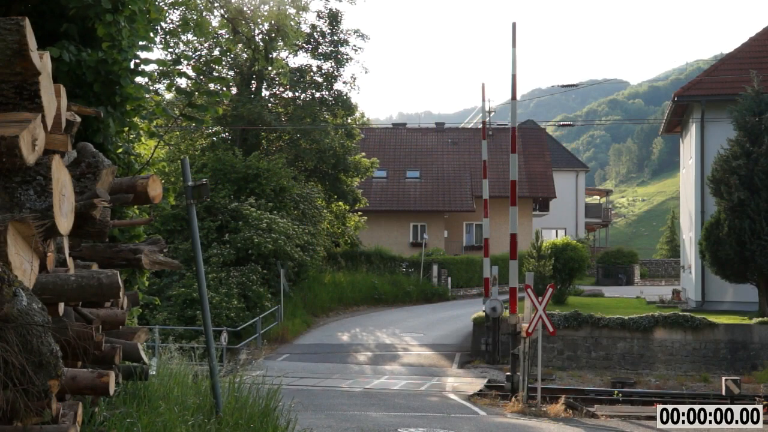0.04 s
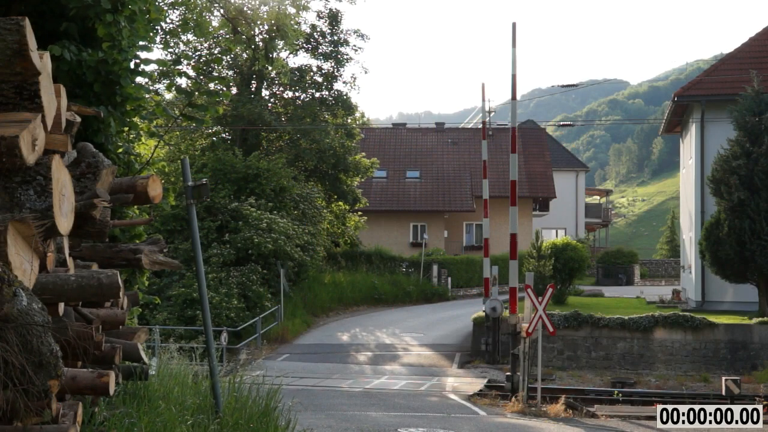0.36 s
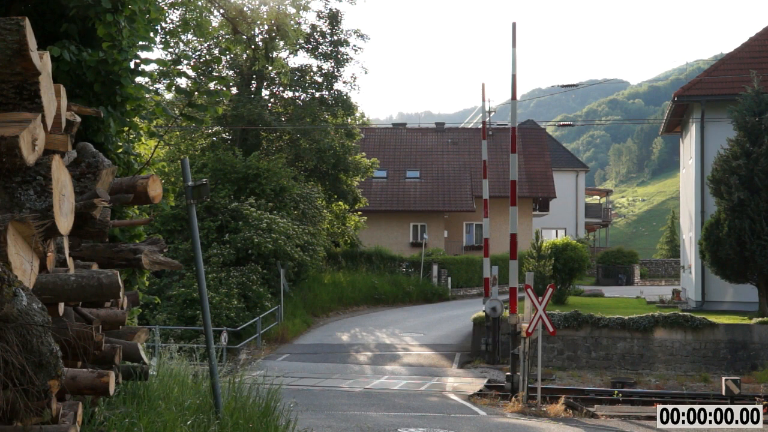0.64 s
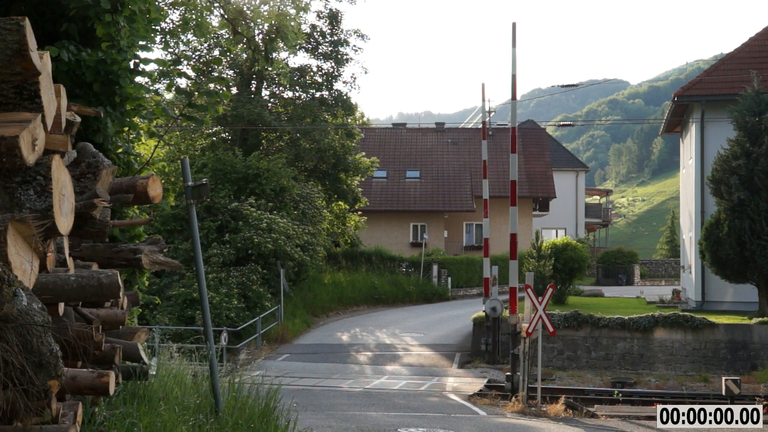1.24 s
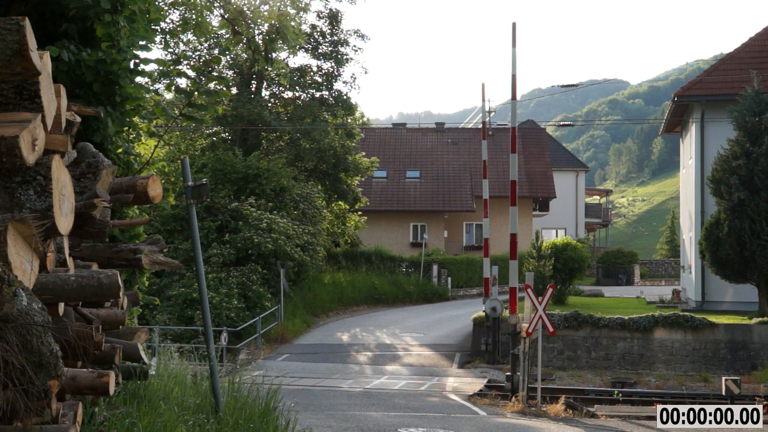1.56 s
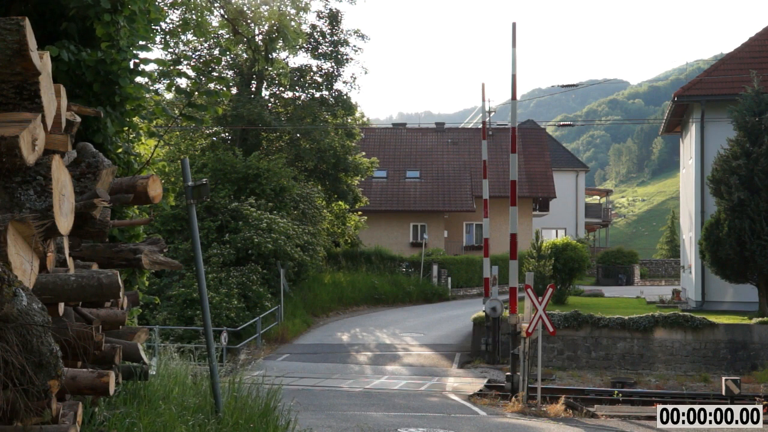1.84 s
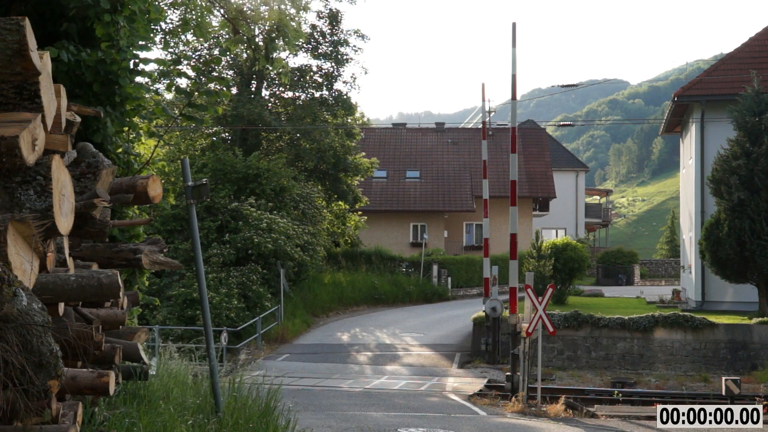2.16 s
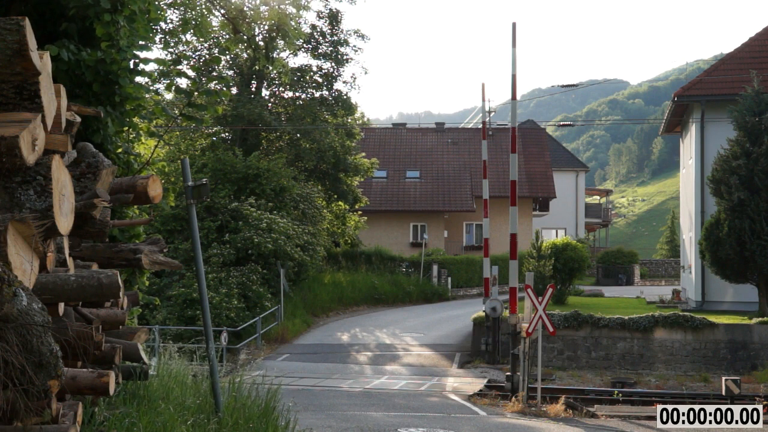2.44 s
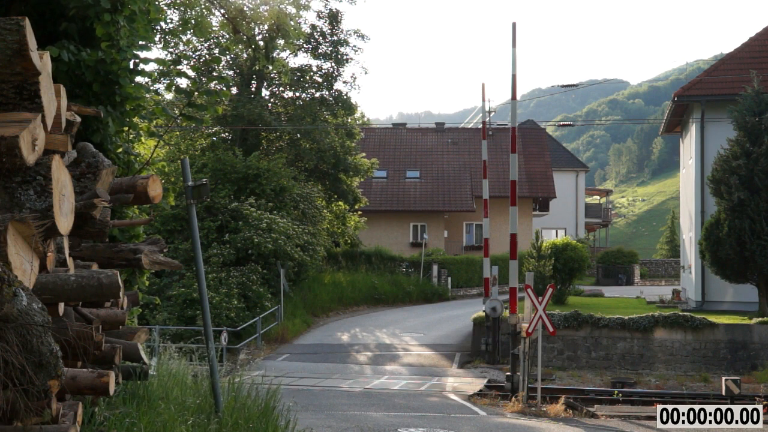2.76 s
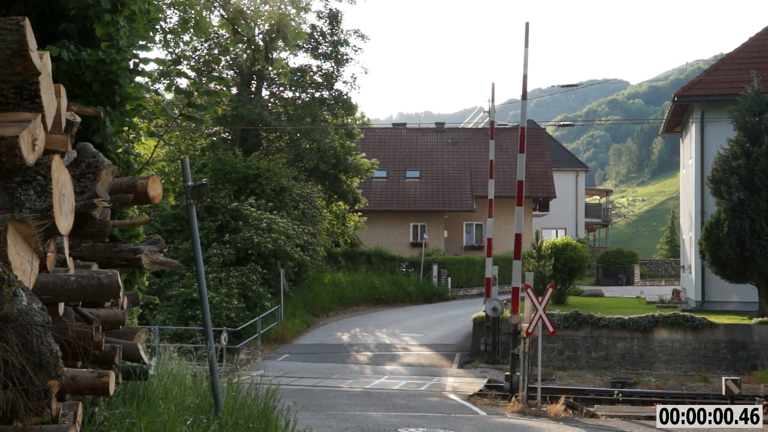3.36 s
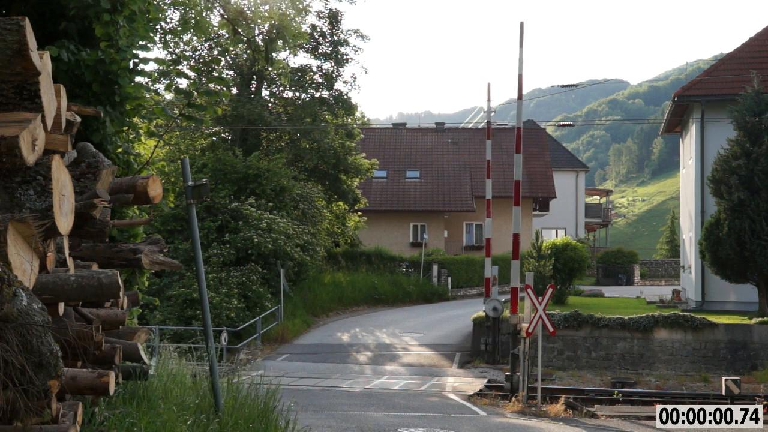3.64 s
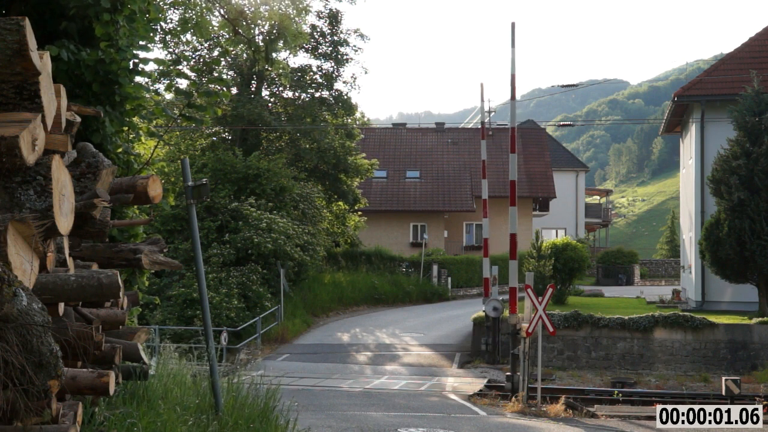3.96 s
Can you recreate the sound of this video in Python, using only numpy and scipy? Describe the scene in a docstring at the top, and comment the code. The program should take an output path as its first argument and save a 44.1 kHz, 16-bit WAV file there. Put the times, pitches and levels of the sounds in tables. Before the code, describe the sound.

A level crossing barrier starts up with uneven metallic clicks, rattles and clunks, slightly to the right. Before it, a songbird sings briefly close on the left and distant birds chirp faintly over a steady outdoor rush.

```python
"""A village level crossing on a calm day. A songbird sings gliding, trilled syllables close by on the
left; others chirp and whistle far off in the trees. Then the barrier's drive starts: a steel pawl
clicks unevenly, small parts ring and rattle, and the gear housing clunks as the booms begin to move.
Houses and trees echo the birds faintly, over the steady rush of the valley."""
import sys
import numpy as np
from scipy import signal
from scipy.fft import rfft, irfft, next_fast_len
from scipy.io import wavfile
from scipy.ndimage import uniform_filter1d, map_coordinates

SR = 44100
rng = np.random.default_rng(int(sys.argv[2]) if len(sys.argv) > 2 else 0)


def put_to_file(sound):
    """Save the sound as 16-bit audio at rate SR, in the file named by the first command-line argument."""
    columns = np.atleast_2d(sound).T  # one column per channel
    safe = np.clip(columns, -1, 1)
    whole_steps = np.round(safe * 32767)
    wavfile.write(sys.argv[1], SR, whole_steps.astype(np.int16))


N = 176400
T = np.arange(N) / SR


# Syllables: t/s, length/s, start, middle and end f/Hz, start and end level/dB, trill rate/Hz, trill depth
SYLLABLES = [(0.0, 0.023, 4140, 3120, 2260, -26.5, -36, 107, 0.068),
             (0.023, 0.025, 2650, 2670, 1870, -34, -41, 61, 0.0086),
             (0.115, 0.026, 6420, 4060, 5100, -35.5, -40.5, 164, 0.21),
             (0.13, 0.08, 2325, 2150, 3040, -47, -35, 182, 0.11),
             (0.191, .1, 2700, 3500, 3750, -31.5, -37, 200, 0.095),
             (0.332, 0.036, 2530, 6270, 5300, -42.5, -38, 135, 0.051),
             (0.365, 0.016, 6000, 4800, 4200, -30, -35.5, 148, 0.12),
             (0.415, 0.013, 1900, 3460, 5400, -56.5, -29, 190, .02),
             (0.43, 0.023, 5190, 5450, 5100, -34, -35.5, 180, 0.13),
             (0.449, 0.033, 5070, 3050, 2110, -24.5, -38, 143, 0.17),
             (0.561, 0.067, 6990, 5700, 5500, -37.5, -42, 68, 0.066),
             (.613, .178, 4700, 3380, 2580, -31, -34, 53.7, .115),
             (0.794, 0.085, 2430, 1950, 1560, -39.5, -58, 52, 0.1)]
# The singer's place on the left: f/Hz, left over right/dB
SONG_PAN = [(2900, 8.5), (4200, 4)]

def songbird(rough=0.02165, treble_hz=4300, direct_hz=5600, swell_db=2.5, waver_db=2.5):
    """Gliding syllables, rougher the higher they go; near leaves, then trees, scatter the treble."""
    voice, rasp = np.zeros(N), wobble(1000)
    for start, length, f0, f1, f2, db0, db1, rate, depth in SYLLABLES:
        u, gate = note(start, length, edge_s=.002)
        glide = arc(u, f0, f1, f2)
        cycle = 2 * np.pi * rate * (T - start)
        trill = 0.8 * depth * np.cos(cycle - 0.73)
        hz = glide * (1 + trill + rough * (glide / treble_hz) ** 2 * rasp)
        dip_db = 40 * depth * (1 - np.cos(cycle - 2 * np.pi * 0.29))  # loudest as the trill slides down
        db = arc(u, db0, (db0 + db1) / 2 + swell_db, db1) - dip_db
        voice += gate * amp(db) * sine(hz)
    voice *= amp(waver_db * wobble(150))
    treble = filtered(voice, lambda hz: hz ** 2 / (hz ** 2 + treble_hz ** 2))
    direct = filtered(voice, lambda hz: 1 / np.hypot(1, (hz / direct_hz) ** 2))
    leaves = echo(treble, t60=.07, build_s=.001)[0]
    trees = echo(treble, t60=0.72, build_s=.005)[0]
    near = filtered(direct + amp(-3) * (leaves + trees), lambda hz: sides(along(SONG_PAN, hz)))
    return near + amp(-10) * echo(voice, t60=0.9, build_s=0.0053)


# Pawl hits: t/s, clatter level/dB, pawl ring level/dB, struck link f/Hz
PAWL_HITS = [(2.573, -41, -48.5, 4720), (2.78, -41, -47, 3470), (2.905, -51.5, -55.5, 3560),
             (3.013, -45.5, -49.5, 2180), (3.116, -51, -57.5, 3700), (3.161, -48.5, -60, 5100),
             (3.249, -52.5, -62, 5030), (3.331, -49.5, -58, 1490), (3.422, -49.5, -62, 3250),
             (3.499, -44, -50.5, 2240), (3.529, -43.5, -72, 1720), (3.633, -50.5, -53, 3920),
             (3.708, -48, -61, 3660), (3.782, -47.5, -49.5, 2540), (3.906, -49.5, -56.5, 4290),
             (3.96, -50, -67, 1360), (3.994, -45.5, -57, 2590)]
# Tone of the clatter: f/Hz, relative level/dB
CLATTER_EQ = [(300, -19.5), (620, -3), (1500, -4.5), (2300, 1), (5100, -1), (6600, -5), (8200, -11),
              (10500, -16), (13000, -17), (16000, -51)]
# Resonances of the linkage: f/Hz, width/Hz, boost/dB
LINKAGE_MODES = [(587, 91, 11.2), (3440, 230, 3.6)]
# The pawl's bright ring: f/Hz, half-width/Hz, relative level/dB
PAWL_MODES = [(10540, 92, -3), (11320, 96, 8), (12800, 83, -13), (14100, 110, -10)]

def pawl(crack_db=2.5, ticks_from_s=3.6, ticks_rise_s=.3, ticks_per_s=64):
    """Each click cracks, sets the linkage clattering and rings the pawl; late on, loose links tick."""
    times, db, ring_db, _ = np.transpose(PAWL_HITS)
    spacing, strength = rng.random((200, 2)).T
    tick_times = ticks_from_s + np.cumsum(-np.log(spacing)) / ticks_per_s
    fade_in = np.clip((tick_times - ticks_from_s) / ticks_rise_s, .01, 1)
    tick_db = -54 + 10 * strength + 20 * np.log10(fade_in)
    ticks = struck(tick_times, tick_db, t60=0.023, attack=0.00022)
    cracks = struck(times, db + crack_db, t60=0.035, attack=0.0002)
    tails = struck(times, db, t60=0.69, attack=0.0019)
    clatter = np.sqrt(cracks ** 2 + ticks ** 2 + tails ** 2) * amp(0.33 * wobble(500))
    modes = lambda hz: sum(amp(level) / (1 + ((hz - f) / w) ** 2) for f, w, level in PAWL_MODES)
    ring = struck(times, ring_db, t60=0.43, attack=0.00045) * wash(modes, DRIVE_LIKENESS)
    return clatter * steel(CLATTER_EQ, LINKAGE_MODES) + ring


def snaps(hz=4800, boost_db=17, t60=0.0032, delay_s=0.000504, expansion=1.37):
    """The pawl lands on its tooth with a snap of a few cycles; hard hits snap out of all proportion."""
    hardest_db = max(hit[1] for hit in PAWL_HITS)
    out = np.zeros(N)
    for start, db, _, _ in PAWL_HITS:
        age = np.maximum(T - start - delay_s, 0)
        peak_db = hardest_db + boost_db + expansion * (db - hardest_db)
        out += amp(peak_db - 60 * age / t60) * np.sin(2 * np.pi * hz * age)
    return out * sides(along(DRIVE_PAN_CURVE, hz))


def links():
    """Each click rings one link most, at that link's own pitch."""
    return sum(ringing(start, db - 6, hz, width=0.038, t60=0.39) for start, db, _, hz in PAWL_HITS)


# Gear clunks: t/s, level/dB, knock f/Hz
GEAR_HITS = [(3.33, -50.5, 1590), (3.5, -55, 1470), (3.527, -36, 1275), (3.583, -50.5, 930),
             (3.71, -47.5, 1180), (3.743, -47, 1110), (3.811, -40, 1354), (3.861, -42, 700),
             (3.904, -48.5, 650), (3.962, -44.5, 1360)]
# Tone of the housing: f/Hz, relative level/dB
HOUSING_EQ = [(100, -38), (300, 3.5), (500, -26), (850, 6.5), (1400, 2.5), (1900, -2), (3300, -8),
              (6000, -23), (15000, -28)]
# Resonances of its panels: f/Hz, width/Hz, boost/dB
PANEL_MODES = [(880, 110, 5.9), (1090, 17, 11), (1254, 13, 21.5), (1400, 28, 11), (1650, 72, 7)]
# Its low body: f/Hz, relative level/dB
BODY_EQ = [(45, -24), (120, -9.5), (300, -2), (450, 0), (650, 2), (3000, -34)]

def housing(judder_db=1.0, body_db_per_octave=-8.5):
    """Slack gears knock on the housing and ring its panels; deeper knocks shake its whole body more."""
    times, db, pitch = np.transpose(GEAR_HITS)
    knocks = sum(ringing(start, level - 1, hz, width=0.059, t60=0.21) for start, level, hz in GEAR_HITS)
    panels = struck(times, db - 3, t60=0.55, attack=0.00088) * steel(HOUSING_EQ, PANEL_MODES)
    body_db = db - 13 + body_db_per_octave * np.log2(pitch / 960)
    body = struck(times, body_db, t60=0.66, attack=0.009) * steel(BODY_EQ, [])
    return (knocks + panels + body) * amp(judder_db * wobble(180))


# Stereo image of the drive: f/Hz, left-right correlation
DRIVE_LIKENESS = [(3100, 0.83), (11000, 0.75)]
# The drive's place, mostly right of centre: f/Hz, left over right/dB
DRIVE_PAN_CURVE = [(250, -0.5), (700, -2.5), (3100, -5), (7000, 1)]

def steel(eq, resonances):
    """The dense modes of a steel part in the drive; a few stand out."""
    boost = lambda hz: sum(db / (1 + (2 * (hz - f) / width) ** 2) for f, width, db in resonances)
    modes = wash(lambda hz: amp(along(eq, hz) + boost(hz)), DRIVE_LIKENESS)
    return filtered(patchy(modes), lambda hz: sides(along(DRIVE_PAN_CURVE, hz)))


def ringing(start, db, pitch, width, t60):
    """One struck part: a cluster of close modes that dies away."""
    tone = wash(lambda hz: 1 / (1 + ((hz / pitch - 1) / width) ** 2), DRIVE_LIKENESS)
    age = np.maximum(T - start, 0)
    envelope = amp(db - 60 * age / t60) * (1 - np.exp(-age * pitch / 2))
    return envelope * tone * sides(along(DRIVE_PAN_CURVE, pitch))


# Distant chirps: t/s, length/s, start f/Hz, end f/Hz, level/dB
FAR_CHIRPS = [(1.309, .03, 4700, 3400, -61.5), (1.442, .04, 3490, 2100, -69),
              (1.692, 0.061, 3330, 3020, -65.5), (1.948, .045, 2450, 2300, -64.5),
              (2.084, 0.071, 2890, 2800, -63.5), (2.142, 0.045, 2500, 2420, -63),
              (2.179, 0.033, 5170, 3500, -49), (2.303, .07, 3960, 4600, -60), (2.4, 0.026, 3540, 2920, -59),
              (2.434, 0.069, 3980, 4500, -59.5), (2.443, 0.015, 2610, 2660, -61),
              (2.477, 0.098, 2670, 2830, -59.5)]

def far_birds(jitter=0.036, rough_hz=3500):
    """Faint slurred notes from the trees; the high ones buzz."""
    voices, rasp = np.zeros(N), jitter * wobble(500)
    for start, length, f0, f1, db in FAR_CHIRPS:
        u, gate = note(start, length, edge_s=0.0029)
        hz = f0 * (f1 / f0) ** u * (1 + rasp * (f1 / rough_hz) ** 4)
        voices += gate * amp(db) * sine(hz)
    return voices + amp(-4) * echo(voices, t60=0.44, build_s=0.0042)


# Contour of the high whistle: t/s, f/Hz, level/dB
WHISTLE_CONTOUR = [(0, 7800, -63), (.4, 7840, -61), (.5, 8070, -59), (1.219, 7670, -61), (1.38, 7460, -81)]

def whistler(jitter=0.0202, flutter_db=3.5):
    """A small bird's thin, quivering whistle."""
    times, hz, db = np.transpose(WHISTLE_CONTOUR)
    tone = sine(np.interp(T, times, hz) * (1 + jitter * wobble(600)))
    voice = (T < times[-1]) * amp(np.interp(T, times, db) + flutter_db * wobble(40.4)) * tone
    return voice + amp(-3.5) * echo(voice, t60=0.32, build_s=0.0068)


# Tone of the air bed: f/Hz, relative level/dB
AIR_EQ = [(22, -38), (48, -17.5), (200, -6), (1050, -0.5), (2200, -12), (4500, -13), (10500, -22),
          (12000, -19), (15500, -22)]
# Its stereo image: f/Hz, left-right correlation
AIR_LIKENESS = [(60, 1), (240, 0.62), (950, 0.22), (12000, 0.96)]

def valley(level_db=-55):
    """The steady far rush of the valley."""
    return amp(level_db + 0.25 * wobble(5.4)) * wash(lambda hz: amp(along(AIR_EQ, hz)), AIR_LIKENESS)


def echo(x, t60, build_s):
    """Stereo scatter from trees and walls."""
    t = T[:SR]
    tail = rng.standard_normal((2, SR)) * amp(-60 * t / t60) * (1 - np.exp(-t / build_s))
    return signal.fftconvolve(x[None], tail / np.linalg.norm(tail[0]), axes=1)[:, :N]


def struck(times, db, t60, attack):
    """Envelope of a part whose energy is topped up by each blow and dies away."""
    samples = np.clip(np.round(times * SR).astype(int), 0, N)
    blows = np.bincount(samples, amp(db) ** 2, N + 1)[:N]
    decay, soften = amp(-120 / (t60 * SR)), np.exp(-1 / (attack * SR))
    energy = signal.lfilter([1], [1, -decay], blows)
    return np.sqrt(np.abs(signal.lfilter([1 - soften], [1, -soften], energy)))


def patchy(x, depth_db=4.0, bins=2, frames=24):
    """Partials drift in level, so different ones stand out from blow to blow."""
    spectra = signal.stft(x, nperseg=1024)[2]
    drift = uniform_filter1d(rng.standard_normal(spectra.shape[1:]), bins, 0)
    drift = unit(uniform_filter1d(drift, frames, 1))
    return unit(signal.istft(spectra * amp(depth_db * drift), nperseg=1024)[1][:, :N])


def wash(colour, likeness):
    """Stereo noise of rms 1 with a colour and a left-right likeness."""
    angle = lambda hz: np.arccos(np.clip(along(likeness, hz), -1, 1)) / 2
    noise = rng.standard_normal((2, N))
    mid, side = filtered(noise, lambda hz: colour(hz) * [np.cos(angle(hz)), np.sin(angle(hz))])
    return unit(np.array([mid + side, mid - side]))


def note(start, length, edge_s):
    """Progress through a note, 0 to 1, and its soft gate."""
    u = np.clip((T - start) / length, 0, 1)
    edge = np.clip(np.minimum(u, 1 - u) * length / edge_s, 0, 1)
    return u, np.sin(np.pi / 2 * edge) ** 2


def arc(u, start, middle, end):
    """A parabola through three values."""
    return start * (1 - u) * (1 - 2 * u) + middle * 4 * u * (1 - u) + end * u * (2 * u - 1)


def sine(hz):
    """A pure tone following a pitch curve."""
    return np.sin(2 * np.pi * np.cumsum(hz) / SR)


def wobble(rate):
    """A smooth random curve, rate knots a second."""
    return map_coordinates(rng.standard_normal(8192), [T * rate], mode="wrap")


def filtered(x, response):
    """x shaped by a gain for each frequency."""
    size = next_fast_len(N + SR // 2)
    return irfft(rfft(x, size) * response(np.fft.rfftfreq(size, 1 / SR)), size)[..., :N]


def along(points, hz):
    """Read a curve of (f/Hz, value) points on a log axis."""
    f, values = np.transpose(points)
    return np.interp(np.log(hz + 1), np.log(f + 1), values)


def sides(pan_db):
    """Left and right gains; positive pans left."""
    return amp(np.array([[.5], [-.5]]) * pan_db)


def amp(db):
    """Decibels to gain."""
    return 10 ** (np.asarray(db) / 20)


def unit(x):
    """Scale to rms 1."""
    return x / np.sqrt(np.mean(x ** 2) + 1e-20)


def scene():
    """Birds, barrier drive and valley air."""
    return songbird() + far_birds() + whistler() + pawl() + snaps() + links() + housing() + valley()


def record(dry):
    """A brick-wall high cut on the mix."""
    return filtered(dry, lambda hz: hz < 15850)


dry = scene()
out = record(dry)
put_to_file(out)
```